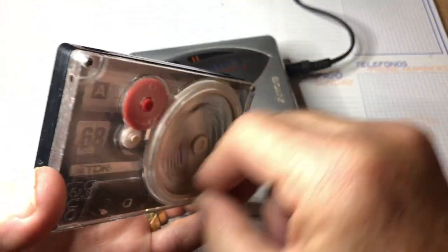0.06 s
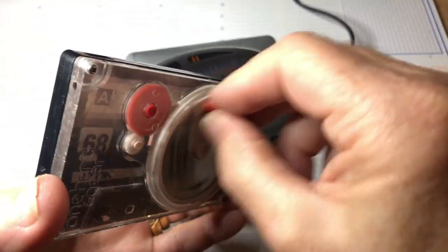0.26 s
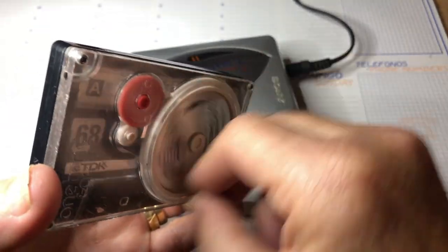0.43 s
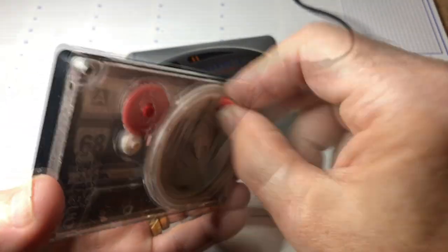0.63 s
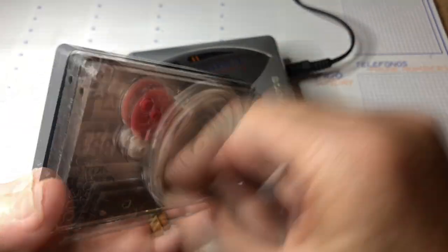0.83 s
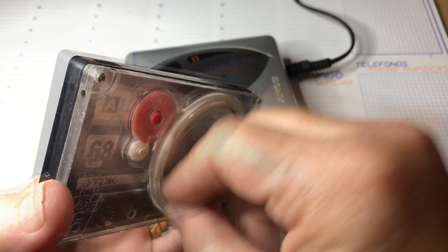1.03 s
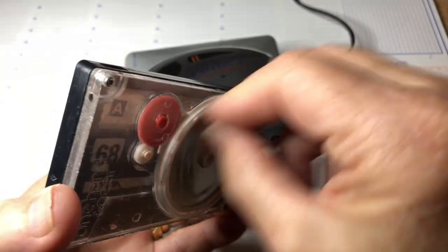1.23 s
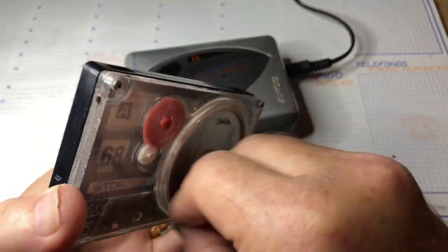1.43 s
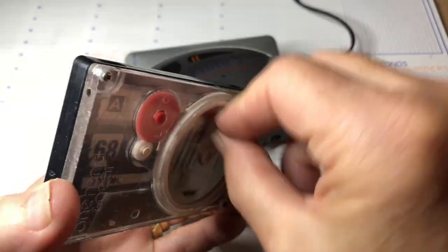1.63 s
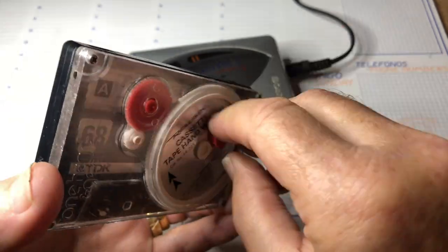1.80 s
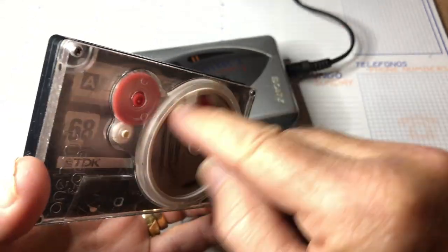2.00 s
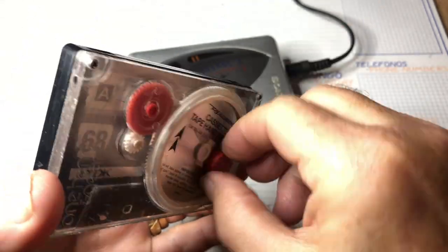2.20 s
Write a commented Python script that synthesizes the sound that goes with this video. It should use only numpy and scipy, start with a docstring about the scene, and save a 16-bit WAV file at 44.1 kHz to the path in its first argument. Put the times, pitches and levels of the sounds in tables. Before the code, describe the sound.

A small plastic hand winder spools a cassette up close. Until about 0.7 seconds it sounds slowed down, a dull, hollow rubbing with scrapes and clicks. Then ticking gears and hissing reels build a bright rattle with tiny falling squeaks and soft knocks. It stops with a clack near 1.65 seconds, and loose ticks follow from 1.9 to 2.3 seconds. An appliance hums faintly in the quiet room.

```python
"""A quiet room, an appliance humming faintly. Up close, a small plastic hand winder spools a cassette.
It is first heard in slow motion as a dull, hollow rubbing, then at normal speed: ticking gear teeth and
hissing reels make a bright rattle, with scrapes, hollow knocks and tiny falling squeaks of plastic.
It stops with a clack; a finger nudges the wheel on in loose ticks."""
import sys
import numpy as np
from scipy import signal
from scipy.fft import rfft, irfft, next_fast_len
from scipy.io import wavfile
from scipy.ndimage import map_coordinates

SR = 44100
rng = np.random.default_rng(int(sys.argv[2]) if len(sys.argv) > 2 else 0)


def transcribe(u):
    """Save the signal u as a 16-bit wav file named by the first command-line argument.

    u: samples, shape (n,) or (channels, n), limited to [-1, 1]; the rate is SR.
    q: integer samples, one column per channel.
    """
    v = np.clip(np.atleast_2d(u).T, -1, 1)
    q = np.round(v * 32767).astype(np.int16)
    wavfile.write(sys.argv[1], SR, q)


N = 103635

# envelope of the gears and reels (time [s], level [dB])
RATTLE_ENVELOPE = [(0, -73), (.72, -46.5), (.8, -39), (.93, -32.5), (1.02, -29.5), (1.13, -29.5),
                   (1.25, -28.5), (1.61, -27), (1.66, -34.5), (1.69, -34), (1.77, -52.5), (1.81, -49),
                   (1.875, -57.5), (1.9, -32.5), (1.98, -41), (2.03, -35.5), (2.07, -46.5), (2.11, -41.5),
                   (2.14, -52), (2.2, -71), (2.26, -45), (2.305, -63), (2.35, -50)]
# tone of the plastic at normal speed (frequency [Hz], level [dB])
BRIGHT_EQ = [(100, -51), (300, -28.5), (550, -24.5), (1000, -22), (1630, -15.5), (3200, -9), (4200, -4.5),
             (5300, 0), (7400, -8.5), (8700, -1), (9800, -5.5), (11300, -1.5), (15800, -9)]


def amp(db):
    """Decibels to gain."""
    return 10 ** (np.asarray(db) / 20)


def unit(x):
    """Scale to rms 1."""
    return x / np.sqrt(np.mean(x ** 2) + 1e-20)


def clock():
    """The time of every sample."""
    return np.arange(N) / SR


def level(rows):
    """Gain per sample from (time [s], level [dB]) points."""
    return amp(np.interp(clock(), *np.transpose(rows)))


def waver(rate):
    """A smooth random curve, rate knots a second."""
    return map_coordinates(rng.standard_normal(N // 8), [clock() * rate + 2], mode="wrap")


def colour(x, points):
    """Minimum-phase EQ of unit power through (frequency [Hz], level [dB]) points."""
    m = 2 * next_fast_len(N)
    hz, db = np.transpose(points)
    gain = unit(amp(np.interp(np.log(np.fft.rfftfreq(m, 1 / SR) + 1), np.log(hz), db)))
    cepstrum = irfft(np.log(gain), m)
    cepstrum[1:m // 2] *= 2
    cepstrum[m // 2 + 1:] = 0
    return irfft(rfft(x, m) * np.exp(rfft(cepstrum)), m)[:N]


def grit(rate, spread_db):
    """Tiny slips of uneven size, rate a second, at rms 1."""
    slips = rng.random(N) < rate / SR
    return unit(slips * rng.standard_normal(N) * amp(spread_db * np.clip(rng.standard_normal(N), -2, 2)))


def chirp(hz, rise_cycles):
    """A short tone that swells, dies and drops in pitch as the contact lets go."""
    drop, fall_cycles = .55, 26
    cycles = hz * np.arange(SR // 20) / SR
    pitch = hz * (1 - drop * (1 - np.exp(-cycles / fall_cycles)))
    swell = cycles / rise_cycles
    return swell * np.exp(1 - swell) * np.sin(2 * np.pi * np.cumsum(pitch) / SR)


def playback_speed(time_s):
    """From 0 (slow motion, two octaves down, drawn out) to 1 (normal speed)."""
    return np.interp(time_s, (.63, .8), [0, 1])


def background():
    """Room air, and the thin hum of an appliance fading up."""
    # room tone (frequency [Hz], level [dB])
    air_eq = [(45, -34), (130, -9), (240, -2.5), (1500, -7), (3000, -13), (15000, -36)]
    # hum partials (frequency [Hz], level before the fade [dB])
    partials = [(861.3, -59), (1200, -61), (1890, -63.5)]
    # fade on the hum (time [s], gain [dB])
    fade = [(.6, -17), (1.1, -3.5)]
    hum = np.zeros(N)
    for hz, db in partials:
        peak = np.sqrt(2) * amp(db + .85 * waver(6.35))
        hum += peak * np.sin(2 * np.pi * (hz * clock() + rng.random()))
    air = unit(colour(rng.standard_normal(N), air_eq))
    return level(fade) * hum + amp(-61.2) * air


def room(x):
    """Adds a short, weak answer from the table and the walls."""
    wet_db, t60_s, predelay_s = -18, .16, .002
    t = np.arange(SR // 3) / SR
    tail = rng.standard_normal(len(t)) * np.exp(-np.log(1000) * t / t60_s) * (t > predelay_s)
    return x + amp(wet_db) * signal.fftconvolve(x, tail / np.linalg.norm(tail))[:N]


def handling():
    """The shell shakes in the hand; in slow motion this is a deep rumble, fading as speed returns."""
    # low wobble of the shell (time [s], level [dB])
    shake_envelope = [(.75, -70), (.85, -61.5), (1.15, -55), (1.6, -54), (1.72, -53.5), (1.79, -65),
                      (2.35, -68)]
    # body of the shell (frequency [Hz], level [dB])
    shell_eq = [(50, -48), (110, -21), (160, -17.5), (235, 0.5), (310, -17), (520, -9), (1000, -24.5)]
    # fade of the rumble (time [s], level [dB])
    rumble_envelope = [(.72, -61.5), (.85, -78), (1.15, -105)]
    # tone of the rumble (frequency [Hz], level [dB])
    rumble_eq = [(20, -19), (65, 6), (95, 0), (130, 5.5), (300, -13)]
    shake = unit(colour(grit(rate=900, spread_db=-2.5), shell_eq))
    rumble = unit(colour(rng.standard_normal(N), rumble_eq))
    return level(shake_envelope) * shake + level(rumble_envelope) * rumble


def ring():
    """The case rings on faintly after the hardest of the slow-motion clicks."""
    start_s, t60_s, modes_hz = .633, .3, (711, 1098)
    t = np.maximum(clock() - start_s, 0)
    modes = sum(np.sin(2 * np.pi * hz * t) for hz in modes_hz)
    return amp(-50) * np.exp(-np.log(1000) * t / t60_s) * modes


def knocks():
    """The case, damped by the hand, rings for only a few cycles."""
    # hollow knocks (time [s], peak level [dB], pitch [Hz])
    hits = [(0.512, -28.5, 1610), (1.038, -44, 251), (1.119, -48, 230), (1.405, -44.5, 692),
            (1.496, -47.5, 395), (1.649, -43.5, 570), (1.654, -47.5, 196), (1.803, -47.5, 487)]
    rise_cycles = 1.2
    out = np.zeros(N)
    for start, db, hz in hits:
        cycles = hz * np.maximum(clock() - start, 0)
        swell = cycles / rise_cycles
        out += amp(db) * swell * np.exp(1 - swell) * np.sin(2 * np.pi * cycles)
    return out


def crackle():
    """Sparse dry snaps from the turning parts, low and high; they stand out as the rattle dies."""
    low = colour(grit(rate=320, spread_db=.5), [(1500, -39), (4800, 4.5), (9000, -10.5)])
    high = colour(grit(rate=320, spread_db=17), [(1500, -35), (6000, -26), (12000, 14)])
    return amp(-14) * level(RATTLE_ENVELOPE) ** .75 * unit(low + high)


def squeaks():
    """Plastic slips on plastic for a few dozen cycles, two octaves lower in slow motion."""
    # squeaking slips (time [s], peak level [dB])
    slips = [(0.0, -40), (0.135, -39), (0.439, -37), (0.537, -33.5), (0.9314, -23), (0.976, -26),
             (1.067, -24), (1.1512, -23.5), (1.262, -19), (1.3135, -19), (1.4012, -22), (1.4398, -18),
             (1.491, -26), (1.5436, -33), (1.662, -22.5)]
    slowed_hz, normal_hz = 1667, 6505
    out = np.zeros(N + SR)
    for start, db in slips:
        hz = slowed_hz + playback_speed(start) * (normal_hz - slowed_hz)
        tone = amp(db) * chirp(hz, rise_cycles=8)
        out[round(start * SR):][:len(tone)] += tone
    return out[:N]


def rub():
    """The winder in slow motion: a dull rubbing, its bright resonance lowered to a hollow tone."""
    # envelope of the rubbing (time [s], level [dB])
    envelope = [(0, -41), (.13, -42.5), (.23, -42.5), (.29, -38.5), (.34, -43.5), (.52, -42), (.58, -39.5),
                (.68, -43.5), (.85, -45), (1.15, -55), (1.8, -78)]
    # its hollow tone (frequency [Hz], level [dB])
    rub_eq = [(100, -30), (600, -14), (1000, -7.5), (1400, 1.5), (2050, -6.5), (3000, -5.5), (6000, -10.5),
              (15000, -20)]
    slips = grit(rate=12000, spread_db=4.5) * amp(2.43 * waver(129.3))
    return level(envelope) * unit(colour(slips, rub_eq))


def scrapes():
    """The wheel scrapes the shell: gritty strokes that bite and sag, hollow in slow motion, then bright."""
    # scraping strokes (start [s], length [s], mid-stroke level [dB])
    strokes = [(0.0, 0.023, -42.5), (0.129, 0.067, -42.5), (0.237, 0.039, -38), (0.282, 0.0086, -31.5),
               (0.433, 0.035, -34), (0.543, 0.041, -33.5), (0.792, 0.013, -34.5), (1.065, 0.033, -33),
               (1.146, 0.054, -30), (1.241, 0.023, -30.5), (1.313, 0.054, -31), (1.403, 0.012, -27),
               (1.441, 0.0089, -25.5), (1.597, 0.0265, -29.5), (1.639, 0.027, -27), (1.716, 0.011, -31.5),
               (1.9, 0.0098, -36), (2.022, 0.025, -31), (2.258, 0.023, -45)]
    # tone of a slow-motion scrape (frequency [Hz], level [dB])
    dull_eq = [(100, -53), (300, -20), (850, -21), (1450, -8.5), (2050, -4.5), (3400, 0.5), (6000, 2.5),
               (11000, -4.5), (15800, -4.5)]
    edge_s, sag_db = .0012, 6
    comb_hz, comb_fall_s, comb_depth = 1400, .035, .7
    dull_power, bright_power, age = np.zeros((3, N))
    for start, length, db in strokes:
        t = np.maximum(clock() - start, 0)
        gate = (1 - np.exp(-t / edge_s)) * np.exp(-np.maximum(t - length, 0) / edge_s)
        power = (gate * amp(db + sag_db * (.5 - np.minimum(t / length, 1)))) ** 2
        bright_share = .9 * playback_speed(start)
        dull_power += (1 - bright_share) * power
        bright_power += bright_share * power
        age = np.where(t > 0, t, age)
    slips = rng.standard_normal(N) * amp(2 * waver(340))
    delay_s = (1 + age / comb_fall_s) / comb_hz  # the comb sweeps down through each stroke
    hollow = unit(slips + comb_depth * map_coordinates(slips, [(clock() - delay_s) * SR]))
    sharp = rng.standard_normal(N) * amp(2 * waver(500))
    dull = colour(np.sqrt(dull_power) * hollow, dull_eq)
    return dull + colour(np.sqrt(bright_power) * sharp, BRIGHT_EQ)


def clicks():
    """Plastic parts knock through their play: a crack, drawn out in slow motion, then chatter."""
    # contacts (time [s], relative level [dB], treble tilt [dB/octave])
    contacts = [(0.0128, -20, -4.5), (0.2096, -24, 3), (0.216, -21.5, -6.5), (0.3203, -21.5, 1),
                (0.5495, -14, -6.5), (0.608, -16, -9.5), (0.6315, -8.5, -7), (0.638, -15.5, -6.5),
                (0.8197, -15.5, 1.5), (1.0315, -13, -1), (1.3673, -9, 7), (1.4899, -9.5, 1.5),
                (1.5425, -9, 5), (1.5786, -10, 4.5), (1.6461, -1, -0.5), (1.6944, -5, -2),
                (1.715, -11, -15), (1.8028, -24, -2.5), (1.8284, -18.5, 5), (1.8508, -19.5, -2.5),
                (1.8771, -20, 3), (1.8903, -20, -4), (1.9295, -10.5, -3), (1.9595, -18, 4),
                (1.9728, -17, 0.5), (1.9982, -10.5, 3), (2.0119, -11.5, 9), (2.041, -13, -5),
                (2.0586, -9.5, 0.5), (2.0799, -18.5, -6), (2.1104, -17.5, -2), (2.1145, -20.5, -2.5),
                (2.2283, -22, -1.5), (2.237, -29, 3), (2.294, -26.5, -4), (2.3184, -24.5, -2),
                (2.3231, -29.5, -1)]
    # tone of hard plastic (frequency [Hz], level [dB])
    click_eq = [(90, -51), (300, -24.5), (1100, -25), (2300, -8), (3400, -6), (5100, 1.5), (7300, -3.5),
                (8700, -2.5), (12000, 0), (15800, -1.5)]
    rise_s, slowed_decay_s, normal_decay_s = .0006, .002, .0004
    chatter_db, chatter_decay_s = -18, .005
    out, t = np.zeros(N + SR), np.arange(2048) / SR
    octaves = np.log2(np.clip(np.fft.rfftfreq(len(t), 1 / SR), 2000, 14000) / 7000)
    chatter = amp(chatter_db) * np.exp(-t / chatter_decay_s)
    for start, db, tilt in contacts:
        decay_s = slowed_decay_s + playback_speed(start) * (normal_decay_s - slowed_decay_s)
        crack = np.minimum(t / rise_s, 1) ** 2 * np.exp(-np.maximum(t - 2 * rise_s, 0) / decay_s)
        phases = np.exp(2j * np.pi * rng.random(len(octaves)))
        noise = unit(irfft(phases * amp(tilt * octaves)))
        out[round(start * SR):][:len(t)] += amp(db) * (crack + chatter) * noise
    return amp(-9) * colour(out[:N], click_eq)


def gears():
    """Gear teeth tick unevenly, each with a tiny falling ping, over the gritty hiss of the reels."""
    count, tooth_hz, scatter = 600, 145.9, .29
    tick_decay_s, spread_db, ping_hz = .0028, 10.5, 5800
    jitter, size, ping_size, detune = np.clip(rng.standard_normal((4, count)), -2, 1.5)
    onsets = np.round((np.arange(count) + scatter * jitter) / tooth_hz * SR).astype(int)
    heard = (onsets >= 0) & (onsets < N)
    strikes = np.bincount(onsets[heard], amp(spread_db * size[heard]), N)
    tick_envelope = signal.lfilter([1], [1, -np.exp(-1 / (tick_decay_s * SR))], strikes)
    teeth = unit(tick_envelope * rng.uniform(-1.2, 1, N))
    pings = np.zeros(N + SR)
    for onset, db, offset in zip(onsets[heard], spread_db * ping_size[heard], detune[heard]):
        tone = amp(db) * chirp(ping_hz * (1 + .06 * offset), rise_cycles=1.9)
        pings[onset:onset + len(tone)] += tone
    reels = unit(grit(rate=20000, spread_db=3.5) * amp(2.4 * waver(90)))
    rattle = colour(amp(-6.5) * teeth + amp(-2.6) * reels, BRIGHT_EQ)
    return level(RATTLE_ENVELOPE) * (rattle + amp(-9.5) * unit(pings[:N]))


def scene():
    """The winder in its room, in mono."""
    winder = rub() + gears() + crackle() + scrapes() + clicks() + squeaks() + knocks() + ring()
    return (room(winder) + handling() + background())[None]


def record(dry):
    """A brick-wall low-pass trims the very top of the mix."""
    top_hz = 15900
    m = next_fast_len(N + SR // 2)
    return irfft(rfft(dry, m) * (np.fft.rfftfreq(m, 1 / SR) < top_hz), m)[..., :N]


dry = scene()
out = record(dry)
transcribe(out)
```